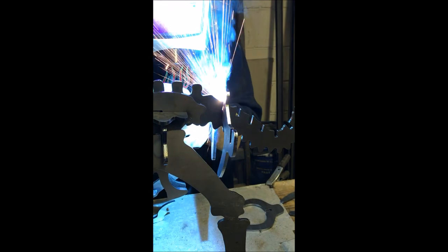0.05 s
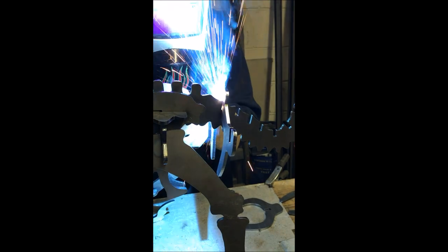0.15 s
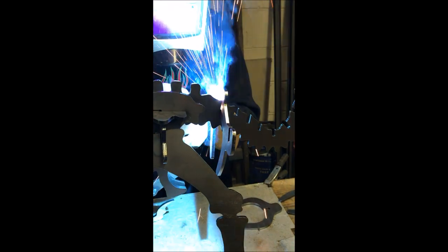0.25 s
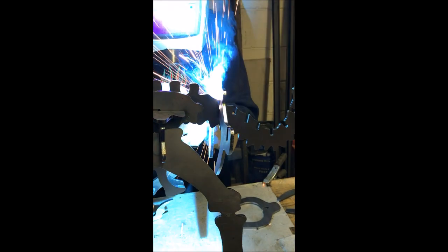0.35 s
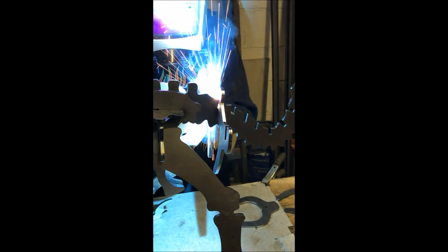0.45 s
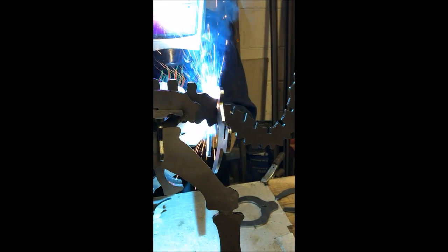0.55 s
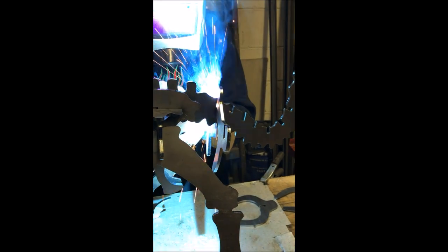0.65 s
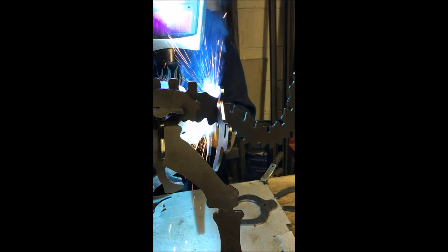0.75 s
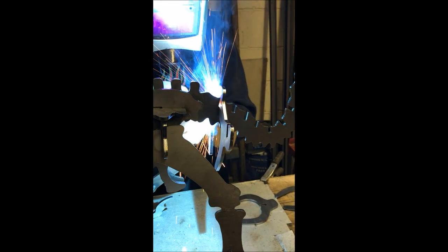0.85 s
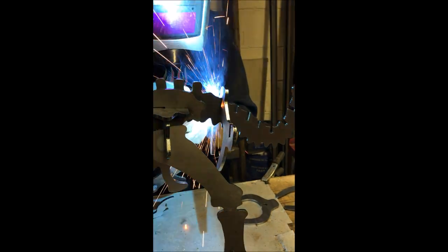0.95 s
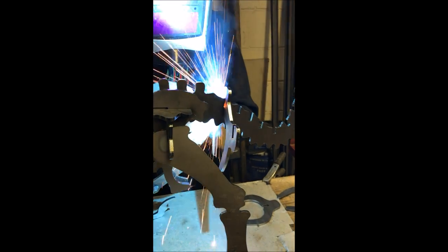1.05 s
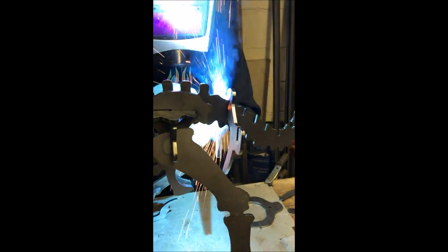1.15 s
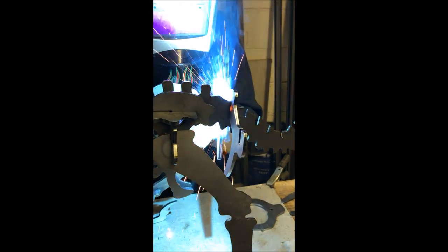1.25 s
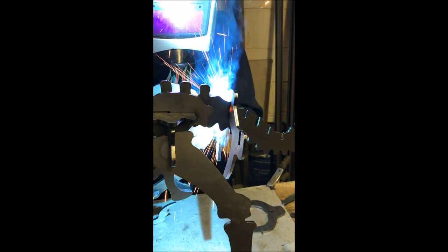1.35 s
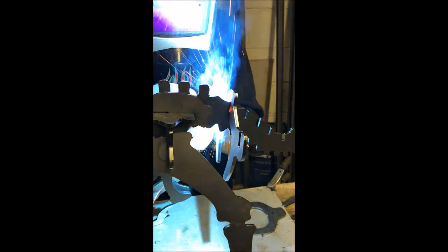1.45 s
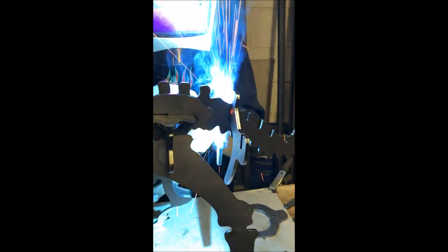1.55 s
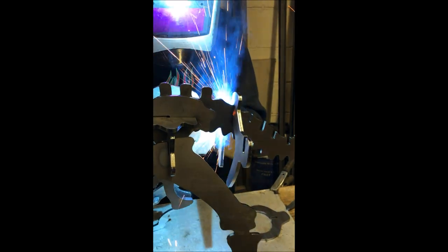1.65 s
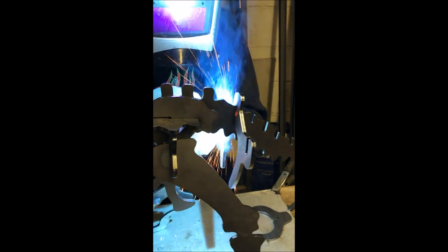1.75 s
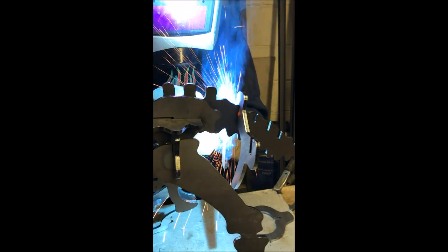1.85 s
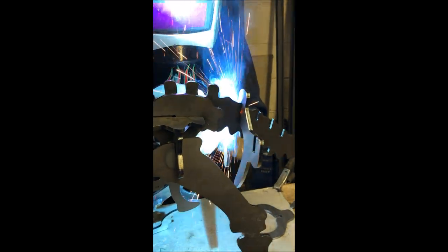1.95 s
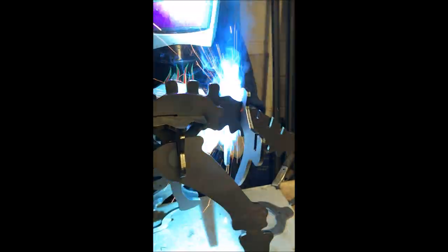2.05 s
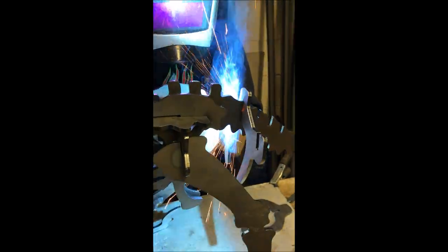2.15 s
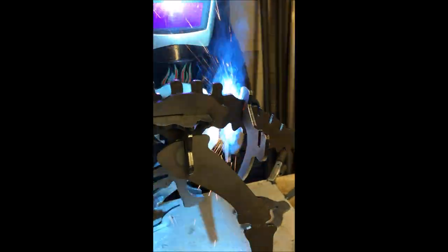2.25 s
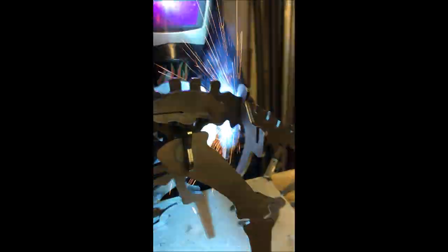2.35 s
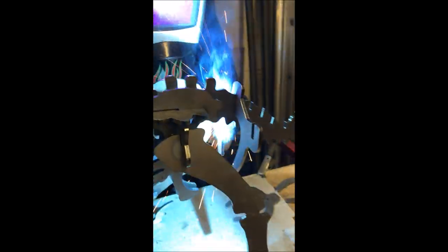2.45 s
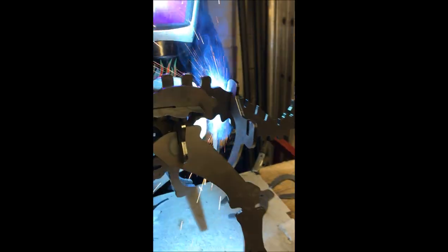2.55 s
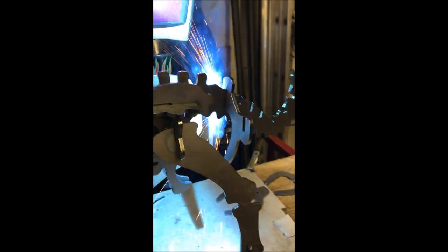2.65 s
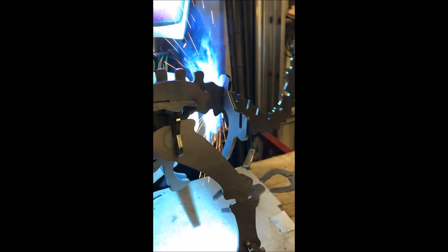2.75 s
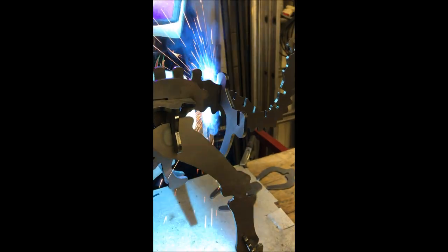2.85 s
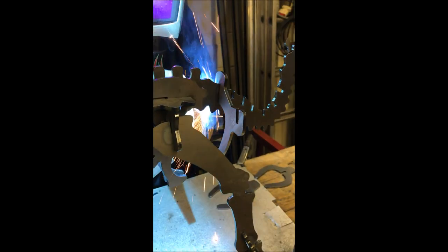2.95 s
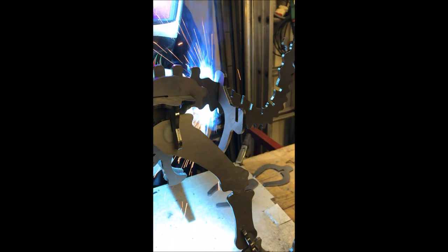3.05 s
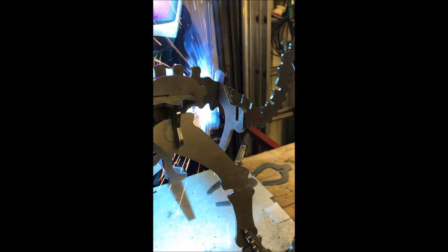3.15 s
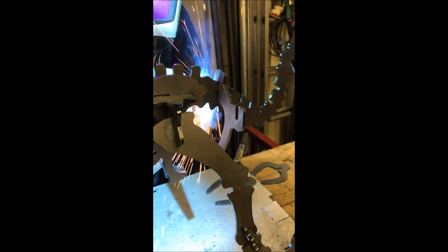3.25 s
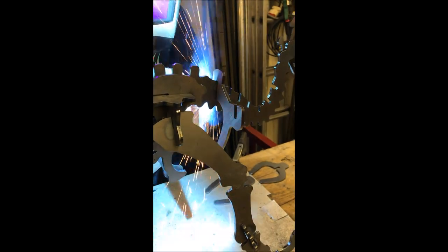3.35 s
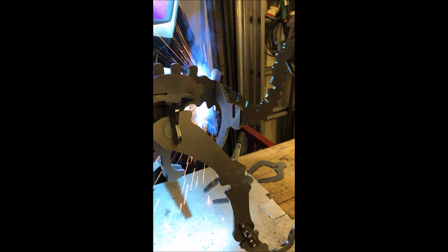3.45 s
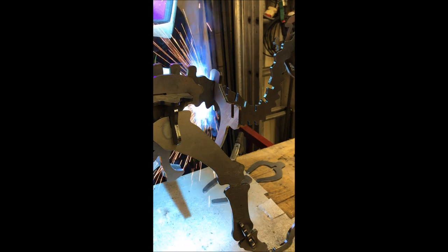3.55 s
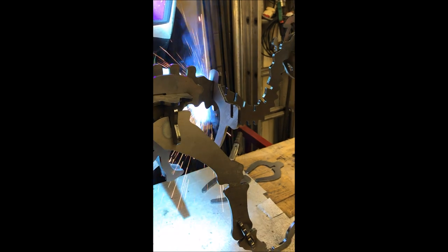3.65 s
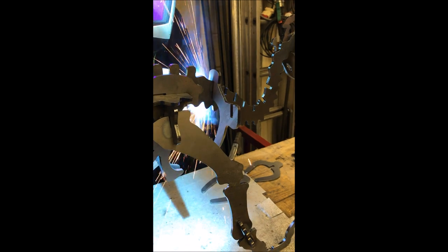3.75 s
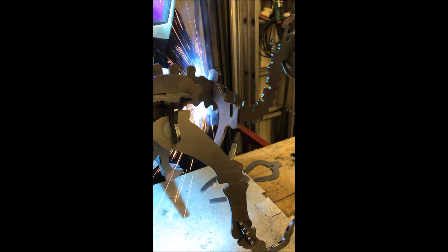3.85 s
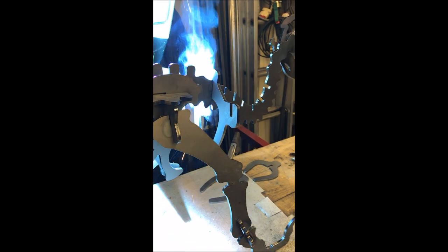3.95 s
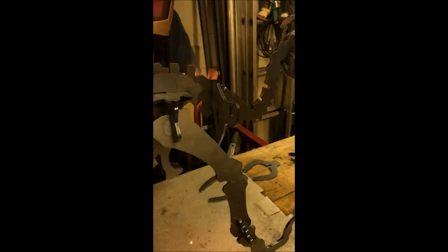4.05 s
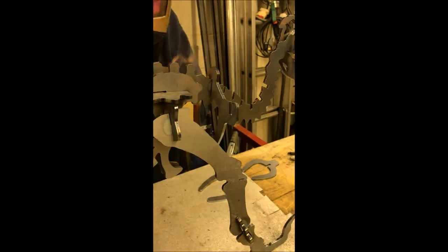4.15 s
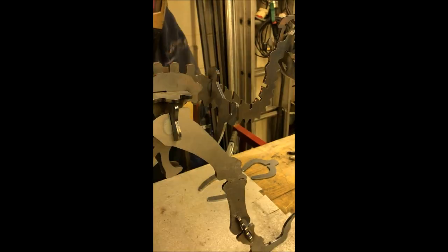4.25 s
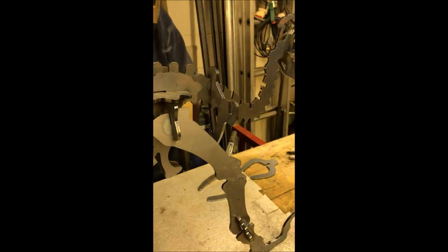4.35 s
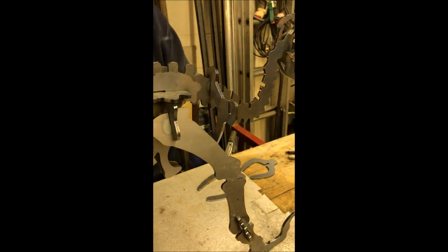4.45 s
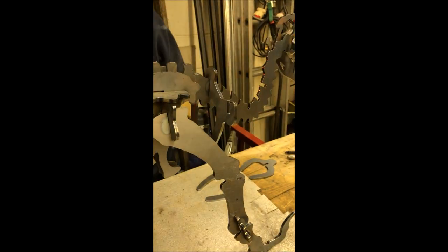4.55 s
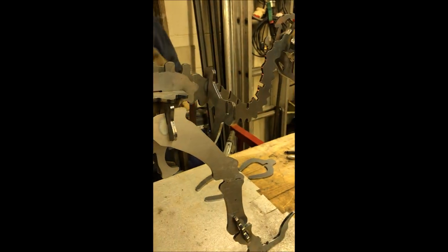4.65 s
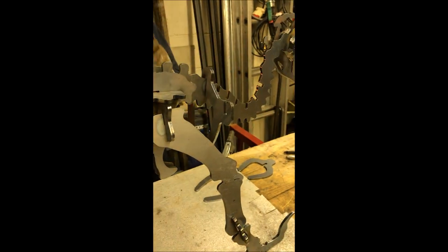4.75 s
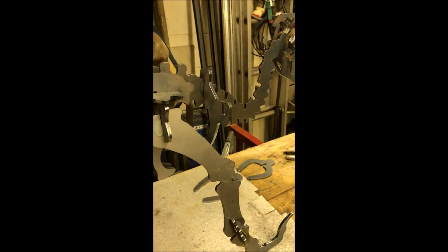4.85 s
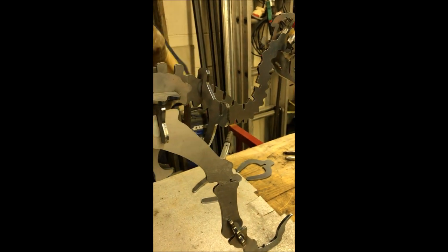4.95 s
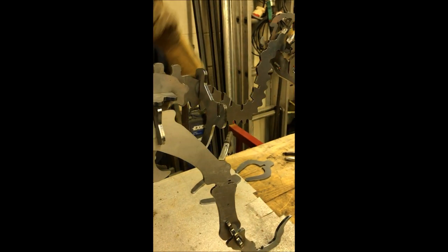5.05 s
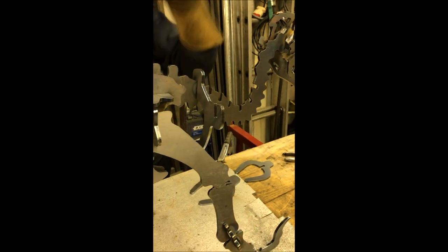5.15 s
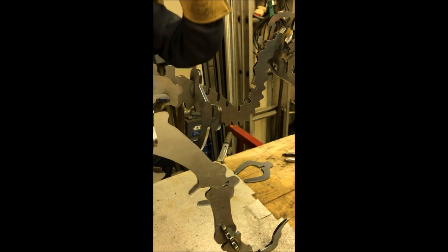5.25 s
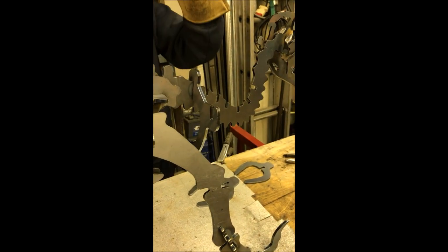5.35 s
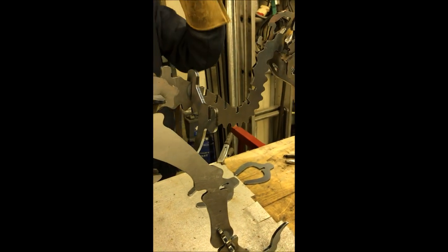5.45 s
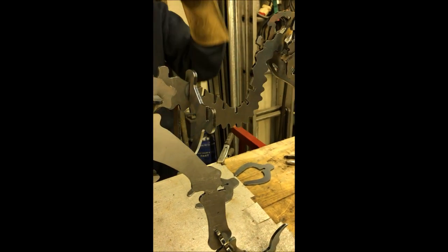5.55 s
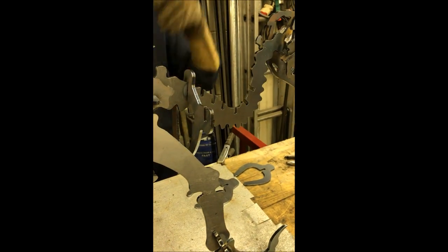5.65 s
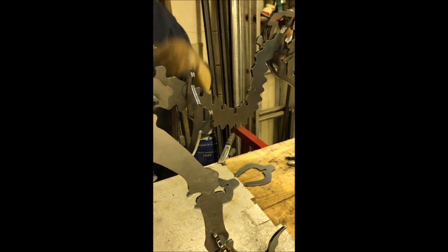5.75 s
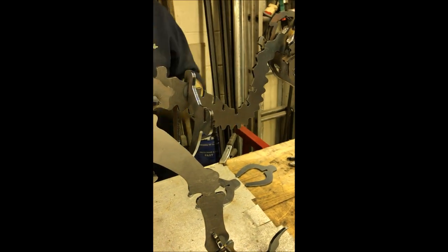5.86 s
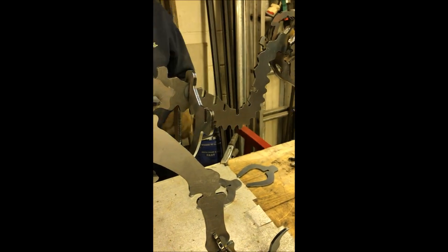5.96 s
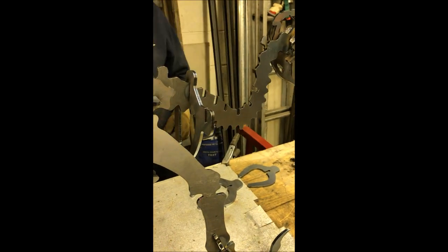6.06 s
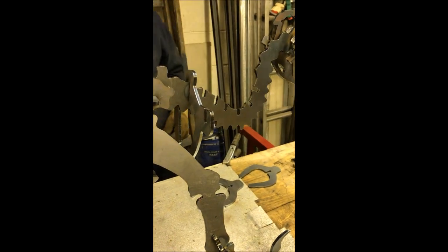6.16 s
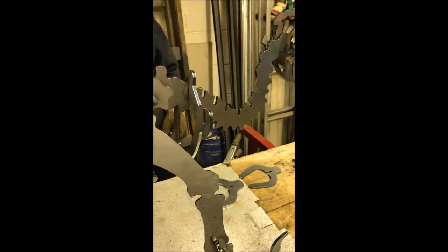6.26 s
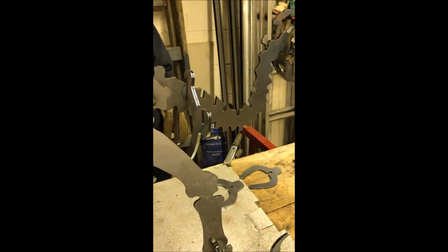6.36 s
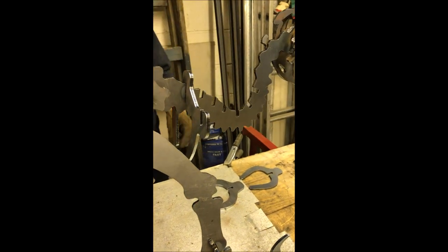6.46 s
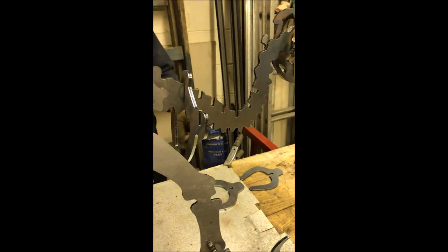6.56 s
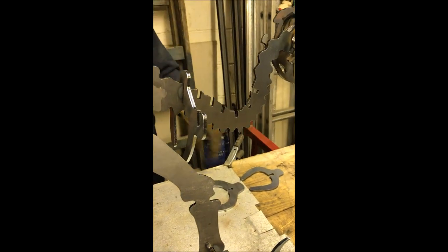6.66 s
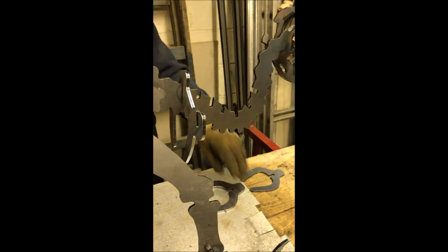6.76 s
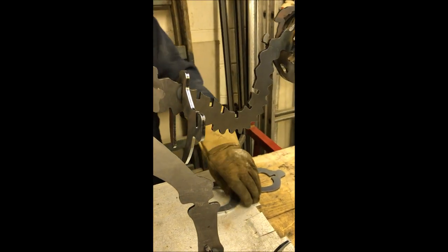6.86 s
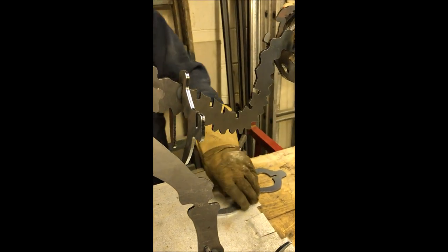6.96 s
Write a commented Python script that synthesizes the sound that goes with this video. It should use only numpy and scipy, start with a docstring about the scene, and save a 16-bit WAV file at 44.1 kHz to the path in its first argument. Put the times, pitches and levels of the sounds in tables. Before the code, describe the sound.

From 0 s a loud wire-feed welding arc is already burning close by in a small workshop: dry, spiky pops about 100 per second fuse into a rasping buzz over bright frying hiss. Tiny gaps with glassy whistling interrupt it, and low rumble and soft gas puffs lie beneath. It is fairly regular until 1 s, then increasingly ragged, with stalls and spatter, roughest around 2.3 s. From 3 to 3.9 s it steadies, with a stronger puff at 3.7 s; metallic resonances shift as the microphone moves. A last sputter, then abrupt stop at 4.06 s and a short room tail. Quiet fan air and faint hum remain. Sleeve rustle at 4.3 and 4.55 s, a light steel clink at 4.37 s, a fainter one at 4.9 s. At 5.2-5.45 s a helmet creaks in quick ticking slips. Only fan until a tool knocks down at about 6.98 s.

```python
"""Wire-feed arc welding in a small workshop

A wire-feed arc welds a sculpture of steel plates, then stops. The shorting wire blows clear in noise-echoed
spikes locked to the rectified mains; uneven feed brings stalls, sputter and hiss, filtered by the plates.
Afterwards the room tail dies away, steel clinks and the helmet creaks up (noise bursts, ringing modes),
a tool is put down, and the machine's fan (coloured noise, hum lines) runs on."""
import sys
import numpy as np
from scipy import signal
from scipy.fft import rfft, irfft
from scipy.io import wavfile

SR = 44100
rng = np.random.default_rng(int(sys.argv[2]) if len(sys.argv) > 2 else 0)


def digitize_waveform(pressure):
    """Quantize a signal to 16-bit integers and store it at the path in sys.argv[1].

    Rows of a 2-D input are taken as channels; values are limited to [-1, 1].
    """
    field = np.atleast_2d(pressure).T
    bounded = np.clip(field, -1, 1)
    quanta = np.round(bounded * 32767).astype(np.int16)
    wavfile.write(sys.argv[1], SR, quanta)


N = 308459
T_S = np.arange(N) / SR

# fan and room tone, spectral shape: f/Hz, relative density/dB per Hz
FAN_SPECTRUM = [(25, -11), (50, 4), (90, 2.5), (125, -10), (180, 4.5), (265, -9), (340, -4.5), (450, -12.5),
                (700, -15), (1300, -18.5), (2700, -29), (6000, -36), (10000, -39), (16000, -37.5)]
# fan level before trim: t/s, level/dB
FAN_LEVEL = [(4.3, -49.5), (5.06, -49.5), (5.41, -48), (5.45, -51), (6.85, -50.5), (6.9, -49)]
# idle hum lines: f/Hz, level/dB
FAN_LINES = [(60, -60), (80, -65.5), (100, -62), (171, -62.5), (199.5, -57.5), (318, -67.5), (340, -66)]

# workshop reverberation: f/Hz, t60/s
ROOM_T60 = [(100, 0.21), (500, 0.34), (1400, 0.45), (3700, 0.4), (9000, 0.34), (15000, 0.57)]
# colour of the arc sound sent into the room: f/Hz, gain/dB
ROOM_COLOUR = [(60, -11), (250, -6), (700, -4.5), (1500, -3), (5000, 1), (10000, -4.5), (15000, -0.5)]

# light touches on the steel: t/s, relative level/dB
CLINKS = [(4.373, -44), (4.914, -58)]
# steel modes: f/Hz, relative level/dB, t60/s
STEEL_MODES = [(2290, -14, 0.15), (2900, -6, 0.025), (3375, -7, 0.035), (3950, -1, .025), (4390, -5, 0.045),
               (6939, -19, 0.18), (7950, -12, .1), (8900, -16, .15), (10040, -14, .08), (12210, -18, .15),
               (13370, -1, .03), (13610, -6, .04), (13900, -3, .03)]
# helmet hinge slips: t/s, relative tick/dB, shell/dB, catch/dB
SLIPS = [(5.214, -48, -41, -58), (5.241, -44, -40, -62), (5.249, -37, -32, -54), (5.289, -37, -39, -58),
         (5.298, -37, -36, -58), (5.318, -41, -43, -47), (5.328, -39, -35, -49), (5.367, -36, -36, -47),
         (5.371, -44, -32, -60), (5.403, -30.5, -37, -42), (5.407, -47, -34, -60), (5.436, -39, -50, -44)]
# metal catch modes: f/Hz, relative level/dB, t60/s
CATCH_MODES = [(1780, -15, .06), (2320, -4, 0.023), (2950, -5, 0.018), (3500, -4, .02), (3940, -8, 0.029),
               (4300, -10, .04), (5400, -18, .06), (6860, -18, .06)]
# helmet shell modes: f/Hz, relative level/dB, t60/s
SHELL_MODES = [(384, -0.5, 0.049), (565, -14, 0.033), (820, 1.5, 0.013), (1040, -12, 0.04),
               (1510, -25, 0.016), (2180, -3, 0.01), (2880, -27, 0.011), (3580, -17, 0.0069),
               (4220, -26, .012), (6800, -18, .01)]
# tool put down: t/s, relative level/dB
KNOCKS = [(6.952, -51), (6.985, -26)]
# sleeve brushing past: t/s, half length/s, level/dB
RUSTLES = [(4.265, 0.14, -56), (4.559, 0.075, -55.5), (5.13, 0.11, -64), (5.501, 0.21, -65),
           (6.99, 0.06, -56)]
# sleeve noise shape: f/Hz, relative density/dB per Hz
SLEEVE_SPECTRUM = [(200, 5), (1000, -7.5), (4000, -6), (8000, -13), (15000, -21.5)]

# direct spike's amplitude share of a pop: early, middle, late microphone position [ratio]
SPIKE_SHARE = [0.76, 0.78, 0.62]
# resonances and shadows among the plates, shifting with microphone position:
# early f/Hz, middle f/Hz, late f/Hz, width/Hz, early gain/dB, middle gain/dB, late gain/dB
PLATES = [(178, 184, 180.0, 80.0, 8.5, 10, 8.0), (381, 354, 355, 197, -5, -11.5, -9),
          (800.0, 760, 780, 400.0, -0.5, -3, -3), (1450, 1430.0, 1600.0, 370, 7, 7, 7.0),
          (1774, 1800.0, 1985, 220.0, -6, -9.5, -10.5), (2470, 2404, 2440.0, 300.0, -6.5, -11.0, -8),
          (2763, 2860.0, 3110.0, 623, 10, 11, 12.5), (3913, 3980.0, 4240.0, 170, 7.5, 2.5, 5.5),
          (4770, 4720.0, 5000.0, 160, -5.5, -5.5, -2.5), (4980, 5220.0, 5540.0, 620.0, 3, 6, 6.5),
          (6280, 6100, 6500.0, 470.0, 5.5, 9, 4), (6600, 6740.0, 6970.0, 320, -2.5, -5, 7.0),
          (6890, 7390.0, 8540.0, 330, 4.0, 7.5, 7), (8580, 8860.0, 9680.0, 490, 8.5, 1, 4),
          (10260.0, 10500.0, 10330.0, 680.0, 1, -6, -8), (11260, 11490.0, 11420.0, 227, 7, 3.5, 5.5),
          (11800, 11770, 12310.0, 340, 4.5, 9, 7.5), (12600, 12980.0, 12890.0, 480, 4, 11.5, 7.0),
          (13620, 13460.0, 8400, 570.0, 1.0, -3.0, -6), (15450, 14470.0, 15480.0, 650, 2.0, 3.5, 5)]
# microphone position: t/s, position (0 early, 1 middle, 2 late)
MOVE = [(0.0, 0.09), (0.5, 0.19), (1.0, 0.58), (1.5, 0.62), (2.35, 1.08), (2.7, 1.37), (3.0, 1.56),
        (3.5, 1.82), (4.06, 1.9)]
# overall arc colour: f/Hz, gain/dB
ARC_COLOUR = [(30, -18.5), (70, -14), (130, -19), (230, -0.5), (310, 2), (450, 1.5), (600, 2.5), (850, 0),
              (1100, -1.6), (1600, 0.5), (3000, -2), (4300, -3.5), (9500, -0.5), (15500, -0.5)]
# narrow rings and shadows of the steel, same at every position: f/Hz, width/Hz, gain/dB
PLATES_RING = [(667, 48, 4), (1010, 260, 2.5), (3570, 60, -6.5), (4447, 140, 7)]
# plate resonances also sent into the room: f/Hz, width/Hz, gain/dB
PLATES_RADIATED = [(659.5, 63, 10), (1578, 330, 8), (2160, 830, -3.5), (3080, 270, 1.5)]

# gas puffs pushed out by the arc: t/s, relative level/dB
PUFFS = [(0.305, -31.5), (0.445, -31), (0.485, -26), (1.1, -32), (1.41, -25), (1.897, -25), (3.346, -30),
         (3.672, -16.5), (3.922, -29.5)]
# air swing after a puff: f/Hz, relative level/dB, t60/s
PUFF_SWING = [(70.4, -2, 0.0997), (103, 3.5, 0.034), (197, -3.5, .055)]
# rising gas plume, rumble before trim: t/s, level/dB
PLUME = [(0, -37.5), (0.55, -35), (1.15, -44), (1.8, -46), (2.25, -44), (2.4, -56.5), (3.6, -55.5),
         (3.75, -40.5), (4.06, -47)]
# load buzz lines: f/Hz, relative level/dB
BUZZ_LINES = [(100, -55.5), (200, -49), (300, -60)]
# load buzz gain: t/s, gain/dB
BUZZ_LEVEL = [(0, -3), (0.55, -1.5), (0.9, 2.5), (1.2, -4), (1.75, 4), (2.1, -1), (2.35, -11), (2.9, -8.5),
              (3.06, 4), (3.35, -3), (4.05, -7.5)]

# wire feed: t/s, unrest (0 steady, 1 sputtering)
UNREST = [(0, 0.41), (.55, 0.21), (.85, 0.18), (1.05, 0.68), (2.3, 0.98), (2.8, 0.42), (3.05, 0.13),
          (3.85, 0.16), (4.05, 0.83)]
# single pops off the beat, weak to hard, each after a pause:
# t/s, level before SINGLE_POP_DB/dB, pause before it/s
SINGLE_POPS = [(0.1467, 2.5, 0.021), (0.3892, 6, 0.011), (0.4983, 2, 0.01), (0.7972, 4, 0.029),
               (0.9188, 0.5, 0.017), (0.951, -7.5, 0.028), (0.9665, 1, 0.013), (1.1007, 4, 0.022),
               (1.1501, -1, 0.016), (1.2183, 3, 0.006), (1.2396, 1, 0.017), (1.358, 0.5, 0.013),
               (1.3803, 3.5, 0.015), (1.569, 2, 0.021), (1.948, 2, 0.013), (2.1171, 4.5, 0.013),
               (2.179, 0, 0.005), (2.2, -0.5, 0.016), (2.216, -4, 0.012), (2.2297, 2, 0.008),
               (2.3501, 3, 0.007), (2.38, -2.5, 0.024), (2.408, -3.5, 0.023), (2.4292, 1, 0.02),
               (2.4607, 0.5, 0.021), (2.511, 1.5, 0.012), (2.609, 1.5, 0.016), (2.799, -0.5, 0.016),
               (2.8619, 0, 0.016), (2.878, -1, 0.012), (2.9005, 3.5, 0.018), (2.9994, 2.5, 0.0097),
               (3.3196, 0.5, 0.018), (3.5306, -1, 0.019), (3.6022, -6, 0.021), (3.672, 0.5, 0.036),
               (3.7223, 2, 0.0058), (4.0426, 2.5, 0.013), (4.0562, 2, 0.019)]
# brief swells of the hiss: t/s, half length/s, gain/dB
HISS_SWELLS = [(1.474, 0.021, 3.5), (2.31, 0.011, 2.5), (3.13, 0.0097, 6.5), (3.682, .007, 4.5)]
# crackle gaps spanned by a whistle: t/s, half length/s, gap gain/dB, whistle level/dB, lowest whistle f/Hz
STUTTERS = [(0.046, 0.012, -15, -19.5, 1000), (0.239, 0.013, -15, -22.5, 1000),
            (0.284, 0.012, -17, -19, 1000), (0.407, 0.014, -12, -20, 1000),
            (0.899, 0.0083, -11, -21.5, 1000), (1.18, 0.011, -17, -19, 1000),
            (1.289, 0.0057, -7, -31, 1000), (1.445, 0.015, -24, -19.5, 1000),
            (1.605, 0.01, -13, -19.5, 1000), (1.793, 0.01, -12, -17.5, 2000),
            (1.874, 0.013, -38.5, -20, 1000), (1.967, 0.007, -20, -18.5, 1000),
            (2.028, 0.013, -16.5, -18.5, 1000), (2.357, 0.005, -6, -22.5, 1000),
            (2.394, 0.0079, -14, -25, 2000), (2.654, 0.015, -5, -22.5, 1000),
            (2.755, 0.013, -17.5, -20.5, 1000), (3.181, 0.0075, -17, -18.5, 1000),
            (3.334, 0.01, -19, -16, 1000), (3.441, 0.011, -22, -18.5, 1000), (3.593, 0.0081, -7, -23, 2500),
            (3.643, 0.012, -47, -17.5, 2500), (3.698, 0.008, -10, -17, 2500),
            (3.912, 0.012, -12, -20.5, 2500), (4.018, 0.019, -11, -21, 1000)]
# low hoots within stutters: t/s, f/Hz, level/dB
HOOTS = [(1.46, 185, -33), (1.607, 220, -28.5), (2.007, 530, -31), (2.022, 248, -28.5)]

ARC_OFF_S = 4.062
BEAT_HZ, FIRST_POP_S = 99.9, 0.0076   # one short per half-wave of the mains
POP_DB, SPUTTER_GAIN_DB, SINGLE_POP_DB = 7, 2.5, 7.5   # steady pop; gain at full unrest; gain of single pops
WEAK_SHARE, WEAK_DB = 0.18, -6.5   # share of weak shorts at full unrest; their loss
SPATTER_PER_S, SPATTER_DB = 22, 3   # drop rate at full unrest; base level
HISS_DB, SPUTTER_HISS_DB, HISS_WANDER_DB = -30.5, 1.1, 0.8   # base; gain at full unrest; random spread
STALL_DIP_DB, SHORTING_DIP_DB = -1.5, -0.24   # hiss gain while stalled; while shorting
ECHO_DB, CUTOFF_HZ = -10.5, 15880


def from_db(db):
    """Decibels to amplitude gain."""
    return 10 ** (np.asarray(db) / 20)


def rms_one(x):
    """Scale to unit power."""
    return x / np.sqrt(np.mean(x ** 2) + 1e-20)


def in_time(rows):
    """Interpolate each column of a time curve to every sample."""
    t_s, *columns = np.transpose(rows)
    return [np.interp(T_S, t_s, column) for column in columns]


def at_hz(points, hz):
    """Read a spectrum on a log-frequency axis."""
    point_hz, db = np.transpose(points)
    return np.interp(np.log(np.maximum(hz, 1)), np.log(point_hz), db)


def coloured(x, spectrum, size=4096):
    """Minimum-phase filter: folding the cepstrum makes the response causal."""
    gain = from_db(at_hz(spectrum, np.fft.rfftfreq(size, 1 / SR)))
    cepstrum = irfft(np.log(gain))
    cepstrum[1:size // 2] *= 2
    cepstrum[size // 2 + 1:] = 0
    response = irfft(np.exp(rfft(cepstrum)))[:size // 2]
    return signal.fftconvolve(x, response)[:N]


def noise(spectrum):
    """Coloured noise of unit power."""
    return rms_one(coloured(rng.standard_normal(N), spectrum))


def drift(rate_hz):
    """Random wander of unit rms: noise knots joined by straight lines."""
    return rms_one(np.interp(T_S * rate_hz, np.arange(N), rng.standard_normal(N)))


def swells(rows):
    """Sum of bell-shaped rises, each (t/s, half length/s, height)."""
    return sum(height * np.exp(-((T_S - s) / half_s) ** 2) for s, half_s, height in rows)


def clicks(rows):
    """One impulse per (t/s, level/dB)."""
    s, db = np.transpose(rows)
    out = np.zeros(N)
    at = np.clip(np.round(s * SR).astype(int), 0, N - 1)
    np.add.at(out, at, from_db(db))
    return out


def bursts(hits, length_s, squareness):
    """Each impulse sets off a short burst of fresh noise."""
    shape = np.exp(-(np.arange(SR // 4) / SR / length_s) ** squareness)
    return signal.fftconvolve(hits, shape)[:N] * rng.standard_normal(N)


def ring(hits, modes):
    """Hits excite two-pole resonators, exponentially decaying sines of alternating sign."""
    out = np.zeros(N)
    for k, (hz, db, t60_s) in enumerate(modes):
        radius = from_db(-60 / (t60_s * SR))
        angle = 2 * np.pi * hz / SR
        poles = [1, -2 * radius * np.cos(angle), radius * radius]
        mode = signal.lfilter([0, np.sin(angle)], poles, hits + 1e-18)
        out += (-1) ** k * from_db(db) * mode
    return out


def tones(lines, waver_db):
    """Sine lines of random phase, each wavering in level."""
    out = 0
    for hz, db in lines:
        level = np.sqrt(2) * from_db(db + waver_db * drift(9.1))
        out = out + level * np.sin(2 * np.pi * (hz * T_S + rng.random()))
    return out


def peak_sections(table):
    """Second-order sections for peaks and dips, each (f/Hz, width/Hz, gain/dB)."""
    hz, width_hz, db = np.transpose(table)
    lift = from_db(db / 2)
    damping = np.tan(np.pi * width_hz / SR)
    tune = -2 * np.cos(2 * np.pi * hz / SR)
    zeros = [1 + damping * lift, tune, 1 - damping * lift]
    poles = [1 + damping / lift, tune, 1 - damping / lift]
    return np.column_stack(zeros + poles) / (1 + damping / lift)[:, None]


def peaks(x, table):
    """Chain of resonant peaks and dips."""
    return signal.sosfilt(peak_sections(table), x + 1e-18)


def fan():
    """Fan air as coloured noise with a narrow band of microphone hiss, plus idle hum lines."""
    level_db, = in_time(FAN_LEVEL)
    air = peaks(noise(FAN_SPECTRUM), [(12300, 1200, 9)])
    return from_db(level_db - 1.5) * air + tones(FAN_LINES, waver_db=2.5)


def workshop(x, first_echo_s, treble_db):
    """Diffuse reverberation: noise bands, each decaying at the room's t60 for its frequency."""
    t_s = np.arange(SR * 3 // 4) / SR
    edges_hz = np.geomspace(60, 17000, 11)
    tail = 0
    for low_hz, high_hz in zip(edges_hz, edges_hz[1:]):
        centre_hz = np.sqrt(low_hz * high_hz)
        bandpass = signal.butter(2, [low_hz, high_hz], "band", fs=SR, output="sos")
        band = signal.sosfilt(bandpass, rng.standard_normal(len(t_s)))
        decay = from_db(-60 * t_s / at_hz(ROOM_T60, centre_hz))
        tilt = from_db(at_hz([(2000, 0), (14000, treble_db)], centre_hz))
        tail = tail + band * decay * tilt
    tail = tail * np.clip(t_s / first_echo_s - 1, 0, 1)   # silent to first_echo_s, full at twice that
    return signal.fftconvolve(x, tail / np.sqrt(np.sum(tail ** 2)))[:N]


def sleeve():
    """Brushing cloth: coloured noise in unsteady swells."""
    level = swells([(s, half_s, from_db(db)) for s, half_s, db in RUSTLES])
    return level * from_db(1.3 * drift(40)) * noise(SLEEVE_SPECTRUM)


def tool():
    """Tool knocks: decaying noise bursts, coloured."""
    knocks = bursts(clicks(KNOCKS), length_s=0.03, squareness=1)
    return coloured(knocks, [(100, 11), (550, -1), (950, 5.0), (1400, -4.5), (3000, -4.0),
                             (8000, -13.0), (15000, -17)])


def helmet():
    """Stick-slip creak: each hinge slip ticks and rings the shell and metal catch."""
    slips = clicks([(s, tick_db) for s, tick_db, _, _ in SLIPS])
    shell_hits = clicks([(s, shell_db) for s, _, shell_db, _ in SLIPS])
    catch_hits = clicks([(s, catch_db) for s, _, _, catch_db in SLIPS])
    creak = slips + 0.13 * bursts(slips, length_s=0.0033, squareness=0.58)
    creak = coloured(creak, [(150, 8), (400, 23), (900, 19.5), (2500, 13.0), (4000, 8), (5000, 4),
                             (9000, 1.5), (15000, -20)])
    return from_db(-4.5) * ring(shell_hits, SHELL_MODES) + ring(catch_hits, CATCH_MODES) + creak


def steel():
    """Light touches and their scuff noise ring the steel modes."""
    touches = clicks(CLINKS)
    scuff = bursts(touches, length_s=0.086, squareness=2.6)
    return ring(0.3 * touches + 0.04 * scuff, STEEL_MODES) + from_db(-12.5) * scuff


def handling():
    """Welder's handling noises: steel, helmet, tool and sleeve."""
    return steel() + helmet() + tool() + sleeve()


def gas_and_buzz(burning):
    """Puffs swing the air, the plume rumbles and the loaded machine buzzes."""
    rumble_db, = in_time(PLUME)
    buzz_db, = in_time(BUZZ_LEVEL)
    rumble = noise([(25, -28.0), (55, -1.0), (100, 2.5), (250, -4.5), (800, -51.0)])
    plume = from_db(rumble_db - 4.5 + 5.5 * drift(14)) * rumble
    buzz = from_db(buzz_db) * tones(BUZZ_LINES, waver_db=3.0)
    return ring(clicks(PUFFS), PUFF_SWING) + burning * (plume + buzz)


def plates_at(s):
    """Plate resonances (f/Hz, width/Hz, gain/dB) at time s, interpolated between microphone positions."""
    position = np.clip(np.interp(s, *np.transpose(MOVE)), 0, 2)
    shares = np.clip(1 - abs(position - np.arange(3)), 0, 1)
    plates = np.array(PLATES)
    return np.column_stack([plates[:, :3] @ shares, plates[:, 3], plates[:, 4:] @ shares])


def gliding(x, size=512):
    """Resonances shift block by block as the microphone moves round the sculpture."""
    out, state = np.zeros(N), np.zeros((len(PLATES), 2))
    for i in range(0, int(ARC_OFF_S * SR) + 2 * size, size):
        block = slice(i, i + size)
        out[block], state = signal.sosfilt(peak_sections(plates_at(i / SR)), x[block] + 1e-18, zi=state)
    return out


def reflections(spike, lead_s, lead_db, length_s, count=40, size=1024):
    """Faint lead-in sound just ahead of the spike, then dense plate echoes; spectrum kept nearly even."""
    t_s = np.arange(size) / SR - lead_s
    top = np.argmin(abs(t_s))
    shape = np.exp(-(t_s / length_s) ** 4)
    echoes = rng.standard_normal(size) * shape * np.where(t_s < 0, from_db(lead_db), 1)
    for _ in range(count):   # alternate between a flat spectrum and the wanted envelope and spike
        echoes = irfft(np.exp(1j * np.angle(rfft(echoes)))) * shape ** 0.5
        echoes[top] = 0
        echoes *= np.sqrt(1 - spike ** 2) / np.linalg.norm(echoes)
        echoes[top] = spike
    return echoes


def among_plates(hits, hiss):
    """Pops and hiss take on the echoes and resonances at the microphone's spot."""
    position, = in_time(MOVE)
    spot = np.clip(np.round(position), 0, 2)
    # fresh noise makes every pop differ
    crackle = hiss + from_db(-30) * bursts(hits, length_s=0.0029, squareness=25.0)
    for k, spike in enumerate(SPIKE_SHARE):
        pop = reflections(spike, lead_s=0.0005, lead_db=-8, length_s=0.0021)
        crackle = crackle + signal.fftconvolve(hits * (spot == k), pop)[:N]
    return peaks(coloured(gliding(crackle), ARC_COLOUR), PLATES_RING)


def wavering_body(x, below_hz, waver_db):
    """The dull part of the crackle swells and shrinks on its own."""
    body = signal.sosfilt(signal.butter(1, below_hz, fs=SR, output="sos"), x)
    return x + (from_db(waver_db * drift(15)) - 1) * body


def frying(spits_per_s, spit_db, flicker_db):
    """The arc hisses unsteadily and spits tiny drops."""
    born = rng.random(N) < spits_per_s / SR
    spits = born * from_db(3 * np.minimum(rng.exponential(1, N), 3))
    spits = spits + 0.97 * bursts(spits, length_s=0.00059, squareness=6)
    flickering = from_db(flicker_db * drift(200)) * rng.standard_normal(N)
    return flickering + from_db(spit_db) * rms_one(spits)


def stalled():
    """One through each pause and half a beat past the single pop that ends it, else zero."""
    spans = [(T_S > s - pause_s) & (T_S < s + 0.5 / BEAT_HZ) for s, _, pause_s in SINGLE_POPS]
    return np.any(spans, axis=0) * 1.0


def spatter(unrest, uneven_db):
    """Stray drops burst at random, more often with more unrest."""
    born = rng.random(N) < SPATTER_PER_S * unrest / SR
    return born * from_db(SPATTER_DB + uneven_db * (2 * rng.random(N) - 1.5))


def pops(unrest, stall, jitter_s, sputter_jitter_s, uneven_db, sputter_uneven_db):
    """Shorts blow clear as spikes on the mains beat, ragged with unrest; single pops stand off the beat."""
    beats_s = np.arange(FIRST_POP_S, ARC_OFF_S - 1 / BEAT_HZ, 1 / BEAT_HZ)
    at = (beats_s * SR).astype(int)
    unrest = unrest[at]
    late, size = rng.standard_normal((len(beats_s), 2)).T
    weak = rng.random(len(beats_s)) < WEAK_SHARE * unrest
    pop_s = beats_s + late * (jitter_s + sputter_jitter_s * unrest)
    db = POP_DB + SPUTTER_GAIN_DB * unrest + WEAK_DB * weak
    db = db + size * (uneven_db + sputter_uneven_db * unrest)
    regular = clicks(np.transpose([pop_s, db])[stall[at] == 0])
    single = from_db(SINGLE_POP_DB) * clicks([(s, single_db) for s, single_db, _ in SINGLE_POPS])
    return regular + single


def arc_hiss(hits, unrest, stall, burning):
    """Frying hiss, dipping slightly while the wire is stalled and a touch while it is shorting."""
    shorting = np.clip(signal.fftconvolve(hits > 0, np.ones(int(SR / BEAT_HZ)))[:N], 0, 1)
    level_db = HISS_DB + SPUTTER_HISS_DB * unrest + swells(HISS_SWELLS)
    level_db = level_db + STALL_DIP_DB * stall + SHORTING_DIP_DB * shorting + HISS_WANDER_DB * drift(22)
    hiss = burning * from_db(level_db) * frying(spits_per_s=260, spit_db=-3.0, flicker_db=4.0)
    return coloured(hiss, [(150, -1.0), (700, 1.0), (2500, 1.5), (6000, 4.0), (15000, 3.5)])


def arc():
    """Arc as heard through the gaps between the plates, and as it fills the room."""
    unrest = np.clip(in_time(UNREST)[0], 0, 1)
    stall = stalled()
    burning = np.clip((ARC_OFF_S - T_S) / 0.0048, 0, 1)   # 4.8 ms fade to off
    hits = pops(unrest, stall, jitter_s=0.0002, sputter_jitter_s=0.0008, uneven_db=1.4, sputter_uneven_db=0.5)
    hits = hits + spatter(unrest * burning * (1 - stall), uneven_db=-0.5)
    hiss = arc_hiss(hits, unrest, stall, burning)
    low = gas_and_buzz(burning)
    direct = wavering_body(among_plates(hits, hiss), below_hz=490, waver_db=1.0)
    radiated = peaks(coloured(hits + hiss, ROOM_COLOUR), PLATES_RADIATED)
    return direct + low, radiated + low


def stutter(x, scatter, uneven_db, overhang, count=3):
    """The crackle drops out briefly; a glassy whistle, sines scattered near its resonances, spans the gap."""
    out = x.copy()
    for s, half_s, gap_db, whistle_db, lowest_hz in STUTTERS:
        at = np.arange(max(int((s - 4 * half_s) * SR), 0), int((s + 4 * half_s) * SR))
        t_s = at / SR - s
        hz, _, db = np.repeat(plates_at(s), count, axis=0).T
        hz = hz * (1 + scatter * rng.standard_normal(len(hz)) / np.sqrt(hz / hz.mean()))
        gain = from_db(0.6 * db + uneven_db * rng.standard_normal(len(hz)))
        gain = gain * (hz > lowest_hz) * (db > 0)   # peaks only, no dips
        phase = rng.random((len(hz), 1))
        whistle = rms_one(gain @ np.sin(2 * np.pi * (hz[:, None] * t_s + phase)))
        out[at] *= from_db(gap_db * np.exp(-(t_s / half_s) ** 4))
        out[at] += from_db(whistle_db) * np.exp(-(t_s / (overhang * half_s)) ** 4) * whistle
    return out


def hoots(half_s):
    """Short low sines in bell-shaped swells, within some stutters."""
    out = 0
    for s, hz, db in HOOTS:
        out = out + swells([(s, half_s, from_db(db))]) * np.sin(2 * np.pi * hz * (T_S - s))
    return out


def scene():
    """Everything near the bench, its echo in the workshop, and the fan."""
    direct, radiated = arc()
    touches = handling()
    echo = workshop(radiated + 0.88 * touches, first_echo_s=0.0014, treble_db=-0.5)
    bench = direct + touches + from_db(ECHO_DB) * echo
    bench = stutter(bench, scatter=0.022, uneven_db=4.5, overhang=1.55)
    return (bench + hoots(half_s=0.018) + fan())[None]


def record(dry):
    """Deepest rumble is lost, highest spikes are rounded off, top is cut."""
    ceiling, knee = 1.15, 4
    dry = signal.sosfilt(signal.butter(2, 36, "high", fs=SR, output="sos"), dry)
    limited = dry / (1 + np.abs(dry / ceiling) ** knee) ** (1 / knee)
    lowpass = signal.firwin(401, CUTOFF_HZ, fs=SR, window="blackman")
    return signal.fftconvolve(limited, lowpass[None], "same")


dry = scene()
out = record(dry)
digitize_waveform(out)
```